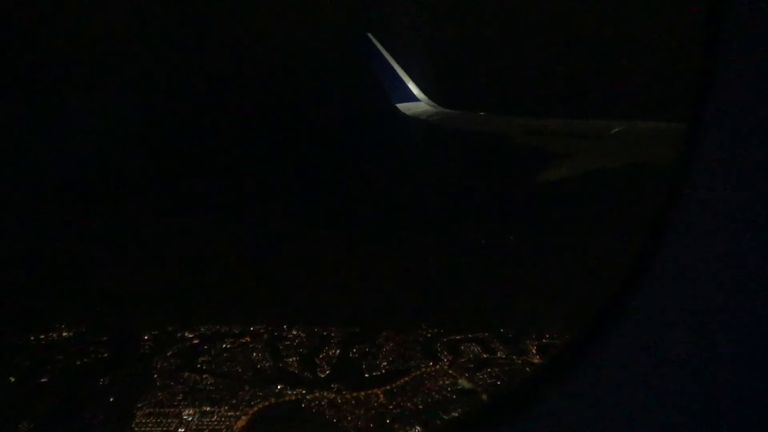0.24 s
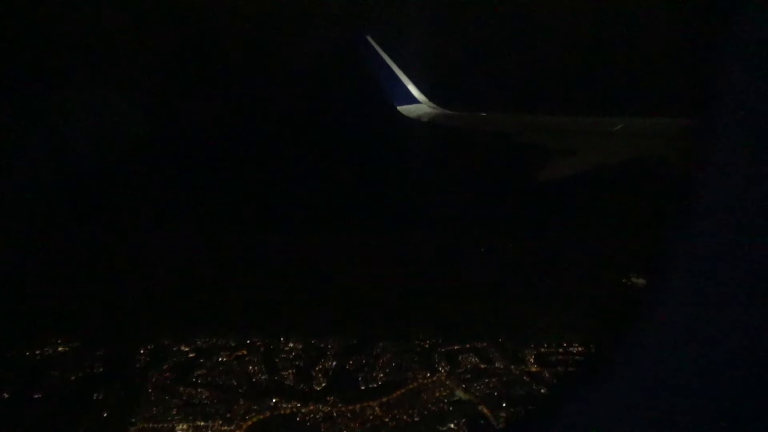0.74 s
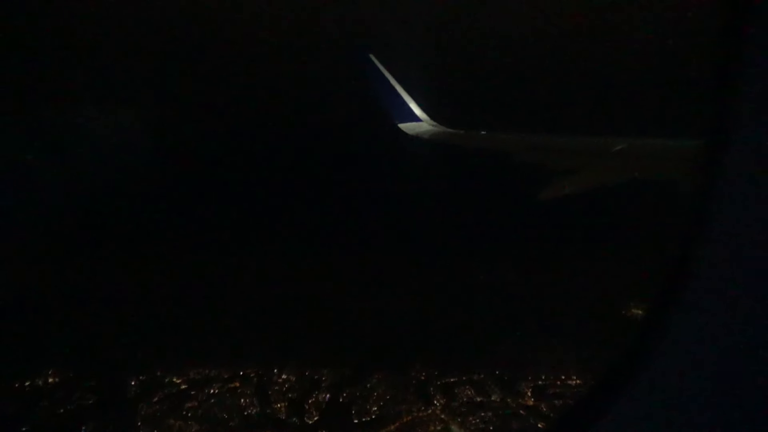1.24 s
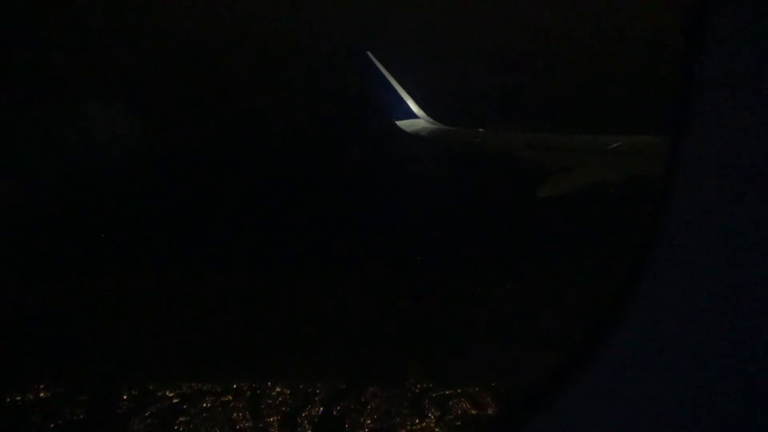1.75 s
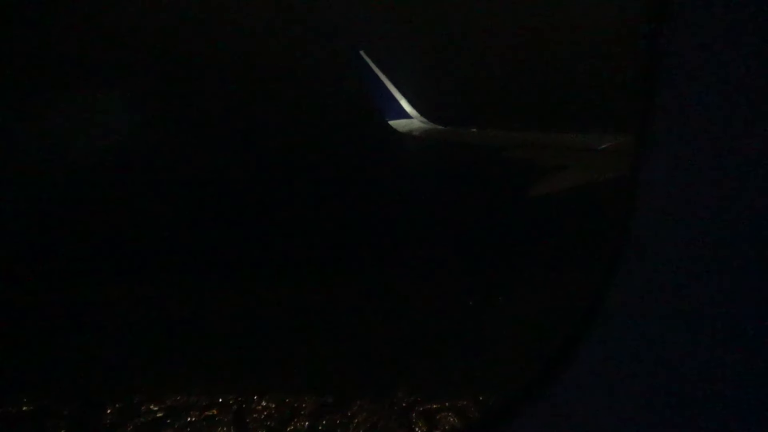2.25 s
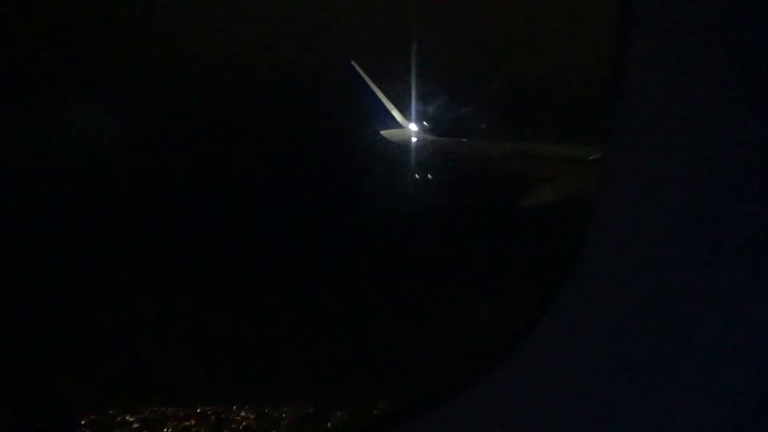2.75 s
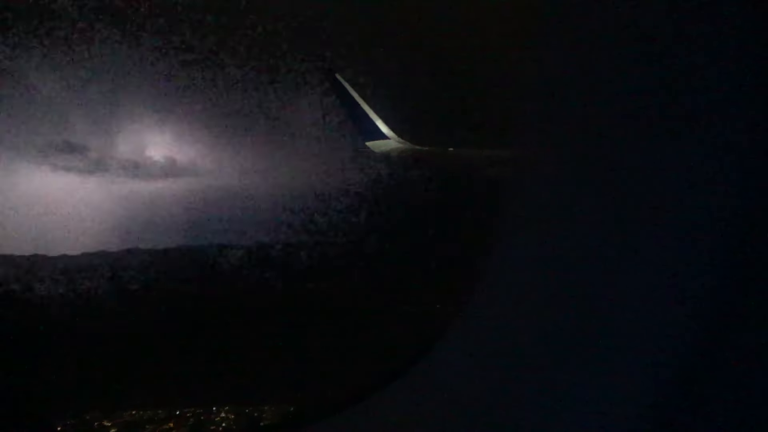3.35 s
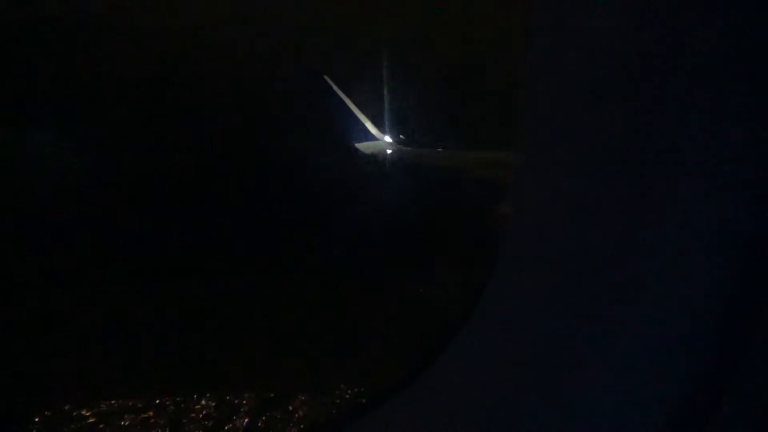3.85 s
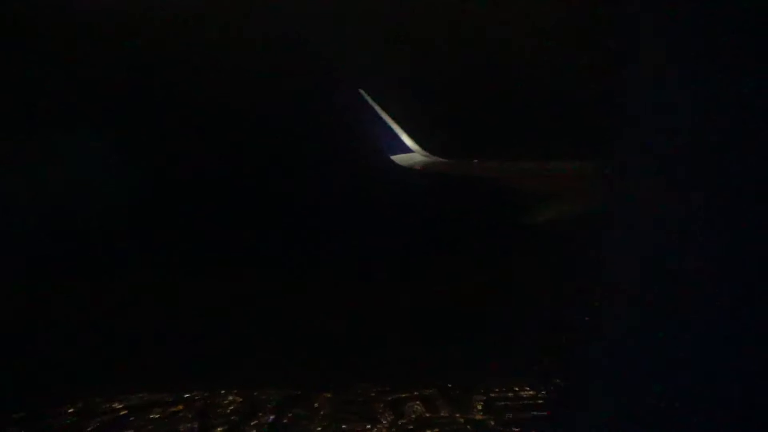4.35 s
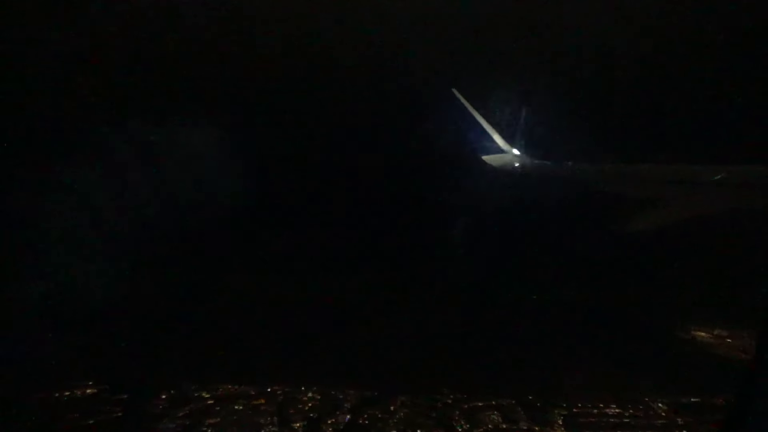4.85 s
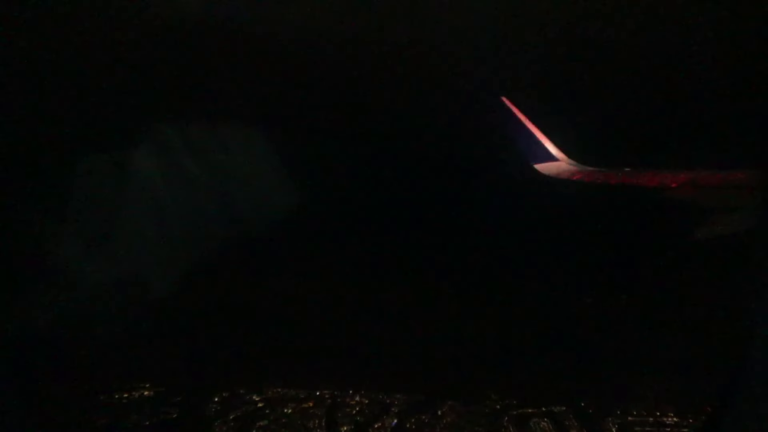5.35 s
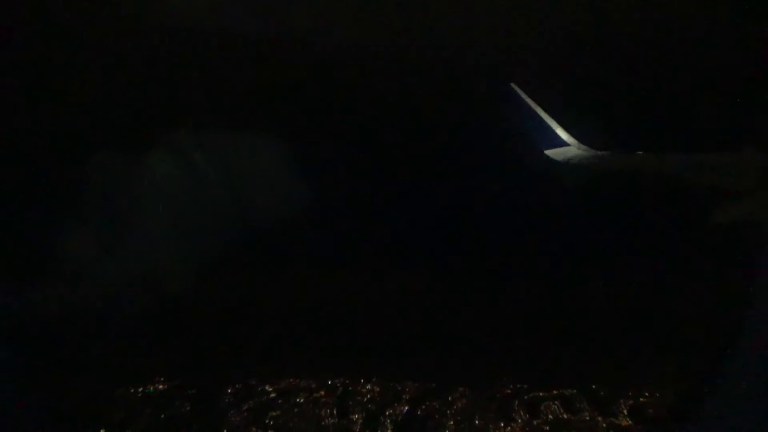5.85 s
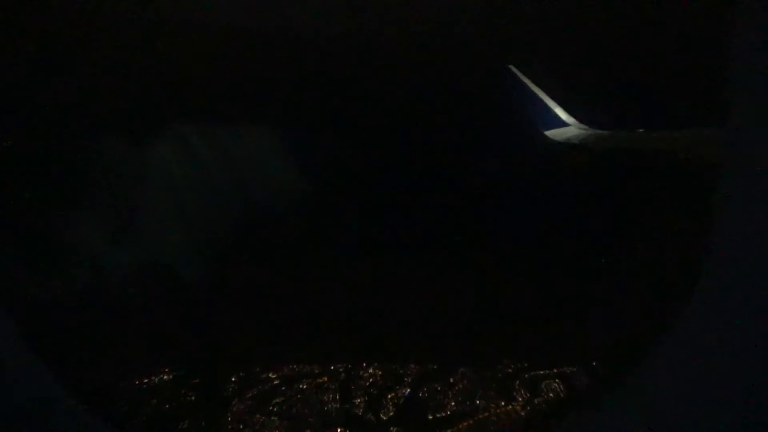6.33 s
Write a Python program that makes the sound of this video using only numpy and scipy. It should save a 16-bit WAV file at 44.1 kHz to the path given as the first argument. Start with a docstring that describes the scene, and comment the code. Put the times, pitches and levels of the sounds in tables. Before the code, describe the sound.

By the window inside an airliner flying above night city lights, a dense low jet rumble and muffled rush of air run unbroken throughout. A metal latch snaps crisply soon after the start. Later come faint bright jingles, small cloth rustles and a hollow trim knock past the middle. Close stereo microphone, padded dry cabin, drone pressing against a limiter.

```python
"""Jet rumble and boundary-layer air roar through an airliner cabin wall, heard by the window in stereo.
Rumble, air and wall panels are shaped noise, as two close microphone ports hear a diffuse field.
A metal latch snaps, trim knocks (noise into resonances); small metal parts jingle (grainy bright bursts).
A fan whines faintly (sines), its second harmonic swelling (noise band) and flickering (noise puffs).
Cloth rustles (swelling bright noise); a fast limiter ducks the whole mix at loud peaks."""
import sys
import numpy as np
from scipy import signal
from scipy.fft import rfft, irfft
from scipy.io import wavfile

SR = 44100
rng = np.random.default_rng(int(sys.argv[2]) if len(sys.argv) > 2 else 0)


def to_wav(s):
    """Save 16-bit WAV."""
    ch = np.atleast_2d(s).T  # columns
    pcm = np.round(np.clip(ch, -1, 1) * 32767)  # PCM
    wavfile.write(sys.argv[1], SR, pcm.astype(np.int16))


N = 290619
HZ = np.maximum(np.arange(N // 2 + 1) * SR / N, 1)  # spectral lines
HALVES = np.array([[.5], [-.5]])  # splits a left-right difference


def from_db(db):
    """Amplitude ratio of a level in dB."""
    return 10 ** (np.asarray(db) / 20)


def rms_one(x):
    """Scale to rms 1."""
    return x / np.sqrt(np.mean(x ** 2) + 1e-20)


def at_hz(points):
    """Frequency table read at every spectral line, linear over log frequency."""
    hz, value = np.transpose(points)
    return np.interp(np.log(HZ), np.log(np.maximum(hz, 1)), value)


def over_time(points):
    """Time table read at every sample."""
    return np.interp(np.arange(N) / SR, *np.transpose(points))


def drift(rate_hz):
    """Slow random wander, rms 1: noise low-passed near rate_hz."""
    noise = rfft(rng.standard_normal(N))
    return rms_one(irfft(noise / (1 + (HZ / rate_hz) ** 2), N))


def diffuse(gain):
    """Stereo noise of the given spectrum, rms 1; coherence, balance and phase set by frequency."""
    # left-right coherence: f/Hz, coherence
    likeness = [(25, 0.95), (60, 1), (125, 0.91), (300, 1), (450, 0.57), (740, 0.55), (1220, 0.7),
                (2010, 0.72), (3330, .66), (5490, 0.67), (7500, 0.99), (9070, 1), (15000, 1)]
    # left over right: f/Hz, level/dB
    balance = [(60, 2), (240, 1.5), (950, 1), (3770, 0), (15000, 0.9)]
    # left ahead of right: f/Hz, phase/rad
    lead = [(25, 0.35), (100, .1), (250, 0.37), (430, 0.039), (690, 0.74), (1030, -0.53), (1290, 0.049),
            (4310, .4), (5770, 0)]
    mid, side = rfft(rng.standard_normal((2, N)))
    alike = np.clip(at_hz(likeness), 0, 1)
    ports = from_db(HALVES * at_hz(balance)) * np.exp(1j * HALVES * at_hz(lead))
    field = np.sqrt(1 + alike) * mid + 2 * HALVES * np.sqrt(1 - alike) * side
    return rms_one(irfft(gain * ports * field, N))


def resonate(x, hz, width_hz):
    """Two-pole resonance, gain 1 on top."""
    r = np.exp(-np.pi * width_hz / SR)
    zeros = np.array([1, 0, -1]) * (1 - r * r) / 2
    poles = [1, -2 * r * np.cos(2 * np.pi * hz / SR), r * r]
    return signal.lfilter(zeros, poles, x)


def add(out, start_s, sound):
    """Lay a short sound into the mix."""
    at = round(start_s * SR)
    out[..., at:at + sound.shape[-1]] += sound[..., :N - at]


def rumble():
    """Engines through the wall: steady low noise."""
    # spectrum shape: f/Hz, relative density/dB
    spectrum = [(12, -56.5), (22, -28.5), (33, -25), (50, -7.5), (65, -10), (100, -7), (135, -5), (160, -7),
                (200, -1.5), (240, -8.5), (300, -10), (430, -24.5), (580, -43), (990, -110)]
    rms_db = -9.5
    return from_db(rms_db) * diffuse(from_db(at_hz(spectrum)))


def air_roar():
    """Air rushing along the skin and from the vents: noise that flutters a little in level."""
    # spectrum shape: f/Hz, relative density/dB
    spectrum = [(240, -18.5), (420, -0.5), (510, 1), (570, -2), (720, -5), (941, -11.5), (1080, -19),
                (1500, -22.5), (2300, -24.5), (2850, -27), (5000, -34), (9300, -40), (12000, -48.5),
                (15400, -58)]
    # roar before flutter: t/s, rms level/dB
    levels = [(0, -28), (1.2, -29), (2.4, -28), (3.6, -29), (5.6, -27.5), (6.59, -29)]
    level_db = over_time(levels) + .25 * drift(9)
    return from_db(level_db) * diffuse(from_db(at_hz(spectrum)))


def wall_panels():
    """Ringing wall panels: one narrow noise band per mode, each wandering in level."""
    # panel modes: f/Hz, half-width at -6 dB/Hz, rms level before wander/dB
    modes = [(201.6, 12.6, -20.5), (220.4, 9, -26), (252.3, 9, -28), (299.2, 9, -29.5), (332.4, 14, -32.5),
             (472.3, 16.7, -34), (631, 6.3, -42.5), (681.6, 6.3, -42), (956, 35, -48.5), (1186, 100, -53),
             (1675, 35, -59), (1877, 71, -60.5), (2010, 100, -57), (2690, 150, -57.5), (3355, 30, -64.5),
             (3935, 200, -62)]
    out = 0
    for hz, half_width_hz, db in modes:
        band = diffuse(1 / (1 + ((HZ - hz) / half_width_hz) ** 2))
        out = out + from_db(db + 1.3 * drift(2.3)) * band
    return out


def latch():
    """Each contact clicks and scrapes into damped modes of the metal tongue and its housing."""
    # contacts: t/s, metal peak/dB, body peak/dB, metal scrape decay/s, body scrape decay/s (1 ms floor)
    contacts = [(0.626, -40, -46, .012, .009), (0.6522, -27, -17, .002, .001),
                (0.6548, -23, -40, .005, .004), (0.66, -27, -23.5, .01, .007),
                (0.688, -45, -52, .005, .005), (0.712, -62, -39, .012, .014)]
    # tongue modes: f/Hz, width/Hz, relative rms level/dB
    metal_modes = [(7170, 300, -5), (7590, 400, -10), (8500, 300, -3), (9150, 400, -6), (12100, 500, -22),
                   (13200, 540, -22), (15300, 500, -18), (3600, 5000, -1), (9000, 5000, -6)]
    # housing modes: f/Hz, width/Hz, relative rms level/dB
    body_modes = [(1540, 140, -7), (1700, 120, -4), (1850, 100, 0), (2550, 300, -15), (2900, 300, -12),
                  (3400, 1500, -12)]
    click, attack_s = 3.5, 0.00097  # click: first sample, against unit noise
    out, t = np.zeros(N), np.arange(6000) / SR
    for start_s, metal_db, body_db, metal_s, body_s in contacts:
        for modes, db, decay_s in ((metal_modes, metal_db, metal_s), (body_modes, body_db, body_s)):
            envelope = np.minimum(t / attack_s, 1) * np.exp(-t / max(decay_s, .001))
            scrape = rng.standard_normal(len(t)) * envelope
            scrape[0] = click
            rings = 0
            for hz, width_hz, mode_db in modes:
                ring = resonate(resonate(scrape, hz, width_hz), hz, 3 * width_hz)
                rings = rings + from_db(mode_db) * rms_one(ring)
            add(out, start_s, from_db(db) * rings / np.abs(rings).max())
    return out


def knocks_and_flickers():
    """Trim knocks and creaks, fan second-harmonic flickers: noise puffs through a doubled resonance."""
    # dull knocks and creaks of the trim, and brief flickers of the fan's second harmonic near 1.9 kHz:
    # t/s, peak before pan/dB, f/Hz, width per resonance/Hz, left over right/dB
    puffs = [(2.069, -36, 1400, 1100, 9), (2.422, -38, 1620, 500, 5), (2.521, -34, 1860, 300, 1),
             (2.687, -41, 2200, 300, 3), (2.732, -39, 1890, 300, 1), (3.555, -28.5, 1700, 1300, 6),
             (4.076, -34, 900, 700, 3), (4.284, -23, 670, 300, 3), (4.287, -25.5, 970, 200, 1),
             (4.286, -32, 1550, 600, 3), (4.435, -28.5, 1500, 2000, -1), (4.49, -34, 1630, 600, 2)]
    attack_s, decay_s = .005, 0.026
    out, t = np.zeros((2, N)), np.arange(4000) / SR
    envelope = np.minimum(t / attack_s, 1) * np.exp(-t / decay_s)
    for start_s, db, hz, width_hz, pan_db in puffs:
        noise = rng.standard_normal(len(t)) + .5 * rng.standard_normal((2, len(t)))
        band = resonate(resonate(noise * envelope, hz, width_hz), hz, width_hz)
        add(out, start_s, from_db(db + HALVES * pan_db) * band / np.abs(band).max())
    return out


def jingles():
    """Small metal parts: a grainy flurry in one bright band, two short rings standing out of it."""
    # t/s, nominal peak/dB, f/Hz, width per resonance/Hz, attack/s (0.5 ms floor), decay/s (2 ms floor)
    flurries = [(0.2808, -44, 6750, 3500, .002, .015), (0.325, -49, 9500, 4000, 0.0092, .03),
                (1.06, -41.5, 6500, 4000, 0.0022, .02), (2.077, -42, 9000, 4500, 0.0061, .014),
                (2.1345, -40, 9000, 2000, .001, .002), (2.168, -47, 7840, 2500, .008, .023),
                (2.434, -45, 7790, 5000, .002, .02), (2.6497, -37, 8800, 6000, .001, 0.018),
                (2.651, -38, 5800, 600, .002, .006), (2.8355, -41.5, 7200, 4020, .002, .02),
                (3.275, -43, 8240, 2500, .002, .025), (3.412, -39, 8100, 4500, 0.011, 0.016),
                (3.7434, -44, 8650, 2000, .002, .018), (3.905, -42, 8800, 2200, .002, .023),
                (4.316, -50, 9500, 3500, .002, .03), (4.323, -41, 6200, 700, .002, .012),
                (4.339, -47, 7500, 4000, .002, .015), (4.358, -47, 8950, 3500, .002, .03),
                (4.378, -50, 9000, 3000, .002, .015), (5.397, -39, 7400, 1200, .002, .022),
                (5.424, -42, 7400, 1500, .002, .018), (6.023, -44.5, 7700, 4000, .002, 0.021),
                (6.457, -42, 6600, 1800, .002, .015)]
    grain_db, grain_hz = 3.0, 350  # unevenness of the tiny contacts
    crest = 3.2  # nominal peak over the rms of the strong part
    out, t = np.zeros(N), np.arange(6000) / SR
    grain = from_db(grain_db * drift(grain_hz))
    for start_s, db, hz, width_hz, attack_s, decay_s in flurries:
        rise = np.minimum(t / max(attack_s, .0005), 1)
        fall = np.exp(-np.maximum(t - attack_s, 0) / max(decay_s, .002))
        flurry = rng.standard_normal(len(t)) * rise * fall
        flurry *= np.roll(grain, -round(start_s * SR))[:len(t)]
        band = resonate(resonate(flurry, hz, width_hz), hz, width_hz)
        ratios = from_db(rng.normal(0, 1.0, 2))  # rings scatter about the centre
        band += 0.6 * sum(resonate(band, hz * ratio, 320) for ratio in ratios)
        strong = band[:round((abs(attack_s) + max(decay_s, .002)) * SR)]
        add(out, start_s, from_db(db) * band / (crest * strong.std()))
    return out


def cabin(x):
    """Padded cabin: adds a short dense decaying-noise tail, partly different on each side."""
    t60_s, tail_db = .05, -13
    t = np.arange(SR // 4) / SR
    shared, own = rng.standard_normal(len(t)), rng.standard_normal((2, len(t)))
    tail = (shared + 0.4 * own) * from_db(-60 * t / t60_s)
    tail *= from_db(tail_db) / np.sqrt(np.sum(tail ** 2, axis=1, keepdims=True))
    return x + signal.fftconvolve(x[None], tail, axes=1)[:, :N]


def fan():
    """Blade tone and its multiples, wavering in pitch and rough in strength."""
    # partials: multiple of the blade tone, rms level before roughness/dB
    partials = [(1, -47), (2, -62.5), (3, -66), (4, -68.5)]
    blade_hz, waver = 941.0, 0.0002  # waver: rms fraction of pitch
    turn = 2 * np.pi * np.cumsum(blade_hz * (1 + waver * drift(3.38))) / SR
    out = np.zeros(N)
    for k, db in partials:
        level_db = db + 1.8 * drift(3) + 1.8 * drift(30)
        out += np.sqrt(2) * from_db(level_db) * np.sin(k * turn)
    return out


def fan_swell():
    """Fan's second harmonic swelling: a narrow noise band near 1.9 kHz that throbs irregularly."""
    # band before throb: t/s, rms level/dB
    swell = [(0, -66), (2.1, -64), (2.35, -58.5), (2.8, -57), (3.15, -57), (3.5, -64), (5.6, -64),
             (6.1, -58), (6.59, -60)]
    centre_hz, half_width_hz, throb_db = 1885, 100, 3.5
    level_db = over_time(swell) + throb_db * drift(11)
    return from_db(level_db) * diffuse(1 / (1 + ((HZ - centre_hz) / half_width_hz) ** 2))


def rustle():
    """Cloth moving nearby: bright friction noise, a swell per movement, in small clumps."""
    # movements: middle t/s, level at the middle before clumping/dB
    movements = [(2.4, -55.5), (3.5, -53.5), (4.4, -62), (5.2, -55.5), (5.7, -56.5)]
    fade_db_s = 37.5
    t = np.arange(N) / SR
    swells = sum(from_db(db - fade_db_s * np.abs(t - middle_s)) for middle_s, db in movements)
    friction = diffuse(1 / (1 + ((HZ - 6000) / 3500) ** 4))
    return swells * from_db(2.0 * drift(14)) * friction


def scene():
    """Sum of all sources; the cabin tail is on latch and jingles only."""
    near_left_db = 0.7  # latch and jingles, left over right
    near = from_db(near_left_db * HALVES) * cabin(latch() + jingles())
    drone = rumble() + wall_panels() + air_roar()
    return drone + near + knocks_and_flickers() + fan() + fan_swell() + rustle()


def record(dry):
    """Fast look-ahead limiter, both sides ducked alike by a share of the excess; then a steep low-pass."""
    limit_db, release_db_s, share, attack_s = -8, 195.5, 0.69, .001
    stop_hz = 15750  # 60 dB down from here up
    level_db = 20 * np.log10(np.abs(dry).max(axis=0) + 1e-9)
    fall_db = release_db_s * np.arange(N) / SR
    held_db = np.maximum.accumulate(level_db + fall_db) - fall_db  # peak hold, linear release
    excess_db = np.maximum(held_db - limit_db, 0)
    r = np.exp(-1 / (attack_s * SR))
    cut_db = signal.lfilter([(1 - r) ** 2], [1, -2 * r, r * r], share * excess_db)
    ahead = round(2 * attack_s * SR)
    cut_db = np.concatenate([cut_db[ahead:], np.full(ahead, cut_db[-1])])
    low_pass = signal.cheby2(24, 60, stop_hz, fs=SR, output="sos")
    return signal.sosfilt(low_pass, dry * from_db(-cut_db))


dry = scene()
out = record(dry)
to_wav(out)
```